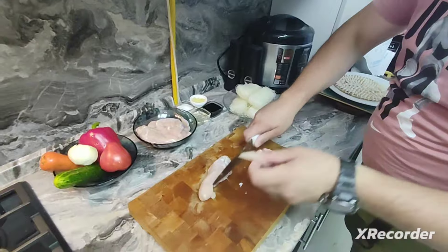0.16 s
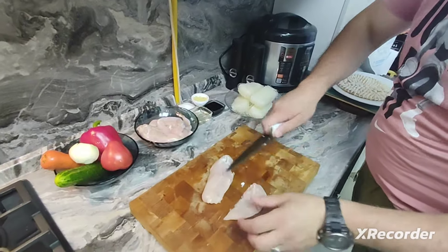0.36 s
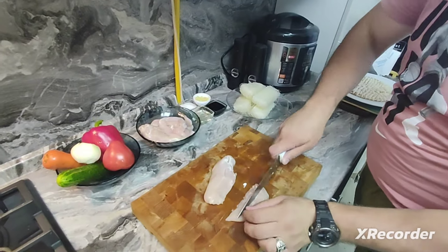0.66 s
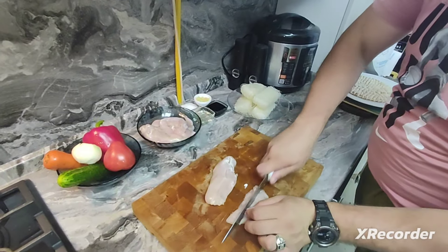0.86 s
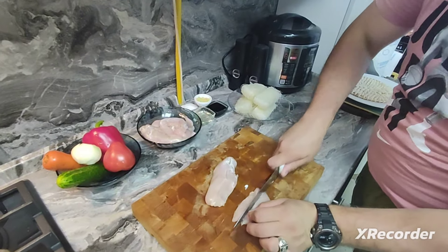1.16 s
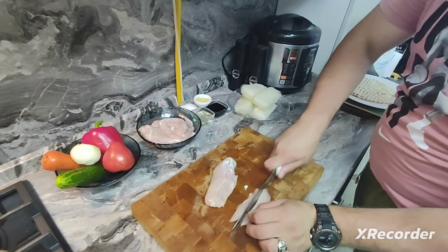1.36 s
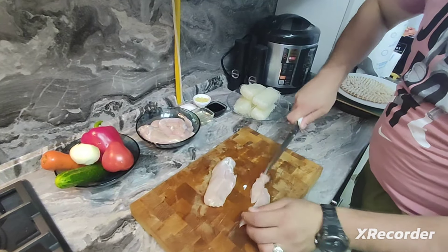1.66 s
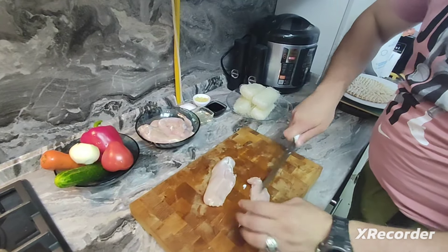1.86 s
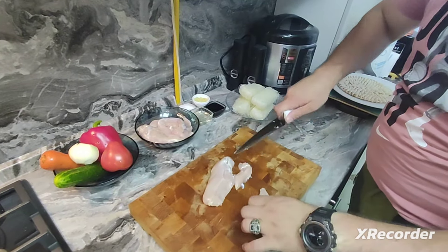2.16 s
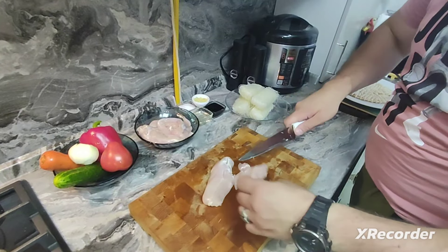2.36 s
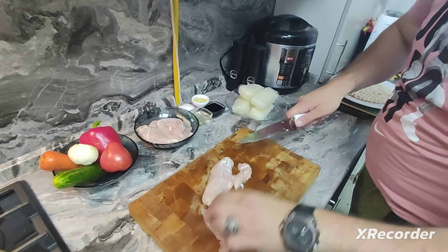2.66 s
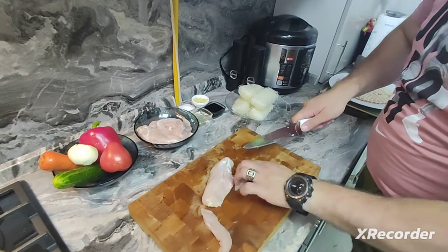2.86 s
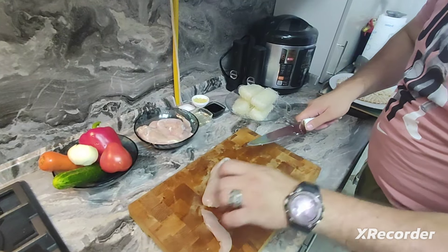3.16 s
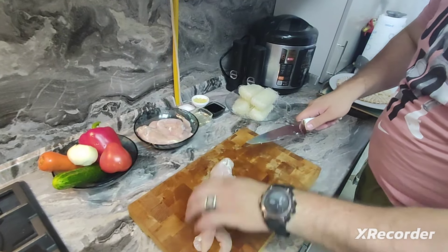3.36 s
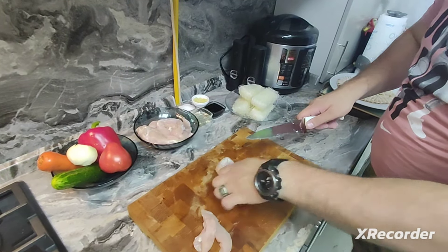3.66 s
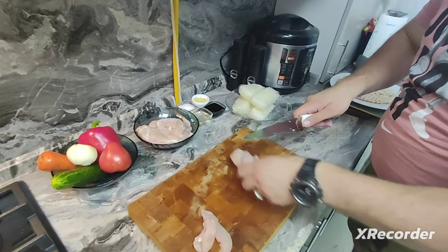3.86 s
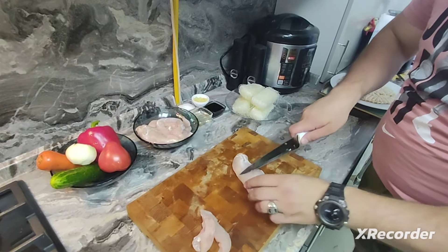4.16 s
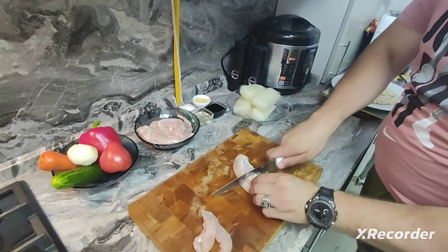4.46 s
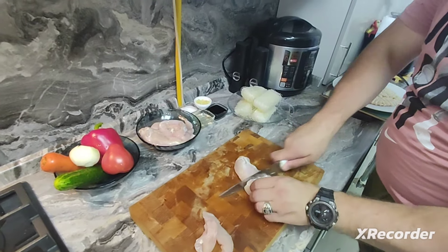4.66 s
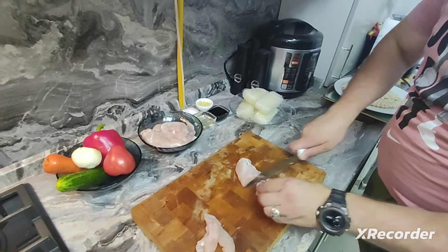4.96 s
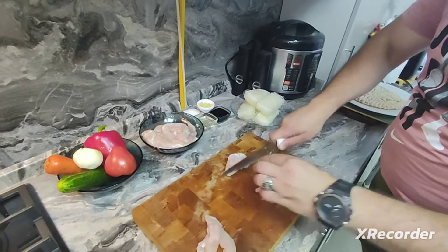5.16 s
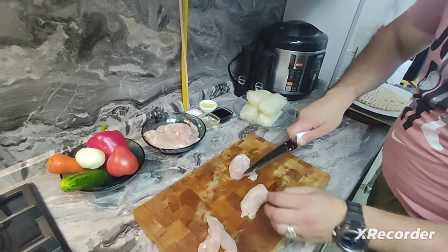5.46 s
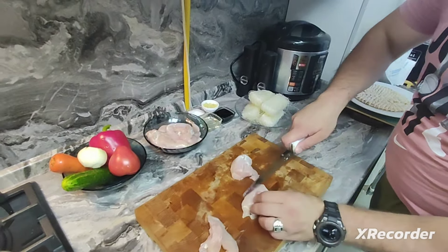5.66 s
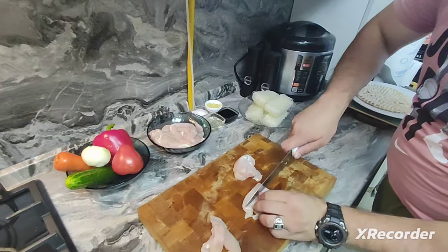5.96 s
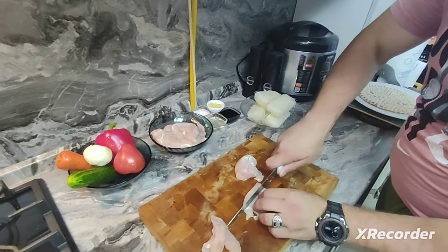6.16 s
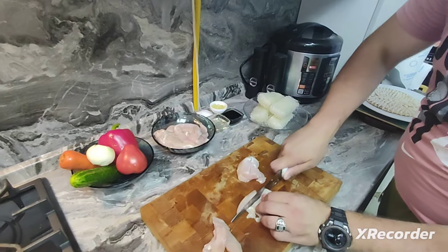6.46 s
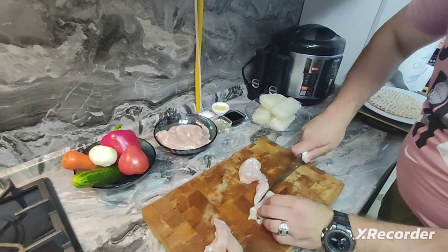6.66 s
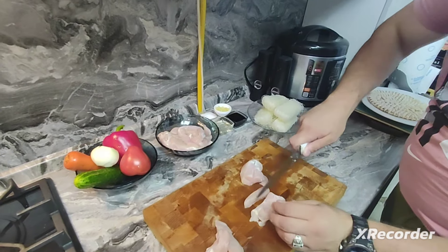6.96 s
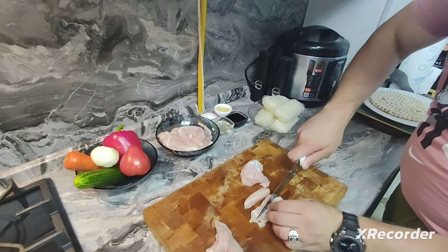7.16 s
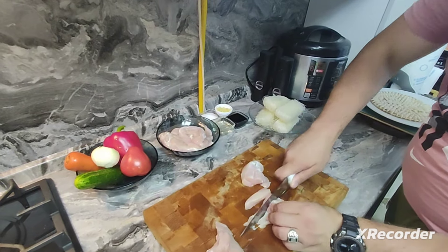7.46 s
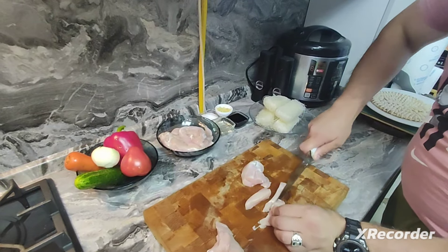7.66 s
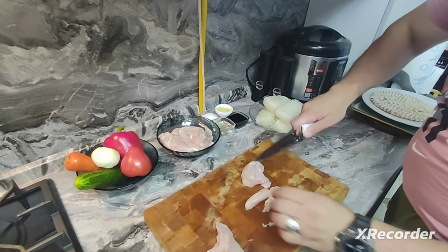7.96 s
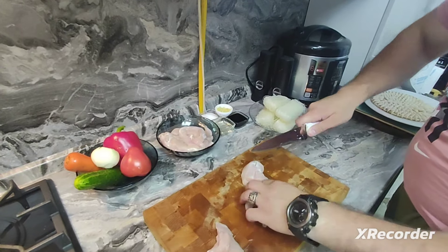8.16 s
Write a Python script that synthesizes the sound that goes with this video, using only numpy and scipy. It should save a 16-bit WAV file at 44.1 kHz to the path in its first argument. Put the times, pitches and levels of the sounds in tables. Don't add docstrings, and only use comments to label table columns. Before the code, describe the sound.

A steady low appliance rumble and airy hiss fill a small, reflective kitchen, heard closely through a phone, with the board stronger on the right. At 0 s the blade skids and knocks on wood with a wet tear; a hard crack follows at 0.33 s. From 0.87 to 1.7 s come grainy, wavering scrapes with soft counter thuds. Sticky peeling and light slaps lead to the hardest clatter at 2.6 s, with a wet slap and fading skid. From 2.9 to 4.4 s there are quieter wet crackles, light taps and a short scrape. Slicing resumes at 4.5-5.1 s, ending in a hollow board boom. A small slap falls at 5.5 s, then relative quiet. A knock at 6.1 s starts firm rasps until 6.8 s; after a pause, another squeaky burst runs 7.35-7.7 s. A faint skid, tap and soft thud close by 8.2 s.

```python
import sys
import numpy as np
from scipy import signal
from scipy.io import wavfile
from scipy.ndimage import uniform_filter1d

SR = 44100
rng = np.random.default_rng(int(sys.argv[2]) if len(sys.argv) > 2 else 0)


def wav_record(signal):
    frames = np.transpose(np.atleast_2d(signal))
    bounded = np.clip(frames, -1, 1)
    quanta = np.round(bounded * 32767).astype(np.int16)
    wavfile.write(sys.argv[1], SR, quanta)


def ratio(d):
    e = np.asarray(d, float) / 20
    return 10 ** e


N = 366030


def evened(x):
    return x / np.sqrt(np.mean(x ** 2) + 1e-20)


def read(points, hz):
    f, value = np.transpose(points)
    return np.interp(np.log(hz + 1), np.log(f + 1), value)


def add(mix, s, sound):
    part = mix[round(s * SR):][:len(sound)]
    part += sound[:len(part)]


def coloured(x, points):
    half = np.log(ratio(read(points, np.fft.rfftfreq(4096, 1 / SR))))
    whole = np.r_[half, half[-2:0:-1]]
    impulse = np.fft.ifft(np.exp(np.conj(signal.hilbert(whole)))).real[:2048]
    return signal.oaconvolve(x, impulse.reshape((1,) * (x.ndim - 1) + (-1,)), axes=-1)[..., :N]


def resonate(x, hz, width_hz):
    r = np.exp(-np.pi * width_hz / SR)
    return evened(signal.lfilter([1, 0, -1], [1, -2 * r * np.cos(2 * np.pi * hz / SR), r * r], x))


def squeak(x, hz, width_hz):
    turn = np.exp(2j * np.pi * np.cumsum(hz) / SR)
    r = np.exp(-np.pi * width_hz / SR)
    smooth = signal.lfilter([(1 - r) ** 2], [1, -2 * r, r * r], x / turn)
    return 2 * (turn * smooth).real


def drift(seconds):
    size = max(int(seconds * SR / 32), 2)
    coarse = rng.standard_normal(N // 32 + 2)
    coarse = uniform_filter1d(uniform_filter1d(coarse, size), size)
    return np.repeat(np.clip(evened(coarse), -2.5, 1.4), 32)[:N]


def grains(per_s, spread_db):
    struck = rng.random(N) < per_s / SR
    sign = rng.choice([-1., 1.], N)
    size = np.minimum(rng.exponential(1, N), 4)
    return evened(struck * sign * ratio(spread_db * size))


def steady(moments_s, values):
    order = np.argsort(moments_s)
    return np.interp(np.arange(N) / SR, moments_s[order], values[order])


SUDDEN_S, SWELL_DB = 0.012, 20


def swells(fullest_s, rise_s, fade_s, db, bend):
    t = np.arange(0, N / SR, .001)[:, None] - fullest_s
    away = np.where(t < 0, -t / abs(rise_s), t / abs(fade_s))
    return (ratio(db - SWELL_DB * np.minimum(away, 10) ** bend) ** 2).sum(1)


def level(power, rest_db):
    return steady(np.arange(len(power)) / 1000, 10 * np.log10(power + ratio(rest_db) ** 2))


# pitch_hz, level_db [dB per Hz]
RUMBLE_SPECTRUM = [(12, -45), (20, -29), (38, -1.5), (70, -3), (103, -1.5), (151, -7), (226, -7), (272, -8),
                   (337, -4), (481, -13), (800, -11.5), (1040, -35), (1760, -120)]
# pitch_hz, width_hz, level_db
HUM_LINES = [(95, 7.9, -63), (125.7, 9.2, -59.5), (225, 11, -67), (367.3, 1.2, -69.5), (823, 6.2, -74.5),
             (1008, 57, -67)]
# pitch_hz, level_db [dB per Hz]
HISS_SPECTRUM = [(500, -25), (780, -15), (1000, 3), (1350, -12), (2100, -6.5), (2500, -0.5), (2800, -10.5),
                 (3500, -21.5), (4200, -5.5), (8000, -12), (11000, -14.5), (13000, 1), (15000, -4.5)]
RUMBLE_DB, HISS_DB = -57.5, -45


def appliance():
    shared = evened(coloured(rng.standard_normal((3, N)), RUMBLE_SPECTRUM))
    rumble = ratio(RUMBLE_DB + drift(0.048)) * (0.84 * shared[0] + 0.82 * shared[1:])
    hum = sum(ratio(db) * resonate(rng.standard_normal(N), hz, width_hz) for hz, width_hz, db in HUM_LINES)
    hiss = evened(coloured(rng.standard_normal((2, N)), HISS_SPECTRUM))
    return rumble + hum + ratio(HISS_DB + 0.46 * drift(0.0077)) * hiss


# pitch_hz, t60_s
KITCHEN_DECAY = [(200, 0.58), (530, 0.12), (1390, 0.085), (3680, 0.12), (9700, 0.11)]


def kitchen(x):
    size = SR // 2
    echoes = np.zeros((3, 2, size))
    at = np.arange(60, size - 20, 20)
    at = at + rng.integers(0, 20, (3, 2, len(at)))
    np.put_along_axis(echoes, at, rng.choice([-1., 1.], at.shape), 2)
    hz, t, z = signal.stft(echoes, SR, nperseg=128)
    fading = ratio(-60 * t / read(KITCHEN_DECAY, hz)[:, None])
    tail = signal.istft(z * fading, SR, nperseg=128)[1]
    tail = tail / np.linalg.norm(tail[0, 0])
    turn = 2 * np.pi * (np.arange(N) / SR * 1.3 + np.arange(3)[:, None] / 3)
    shares = np.sqrt(2 / 3) * np.cos(turn) * x
    return signal.fftconvolve(shares[:, None], tail, axes=2).sum(0)[:, :N]


# start_s, level_db, pitch_hz, overtone_share [ratio]
COUNTER_PUSHES = [(1.264, -35.5, 105, 0.79), (1.28, -39, 140, 0.41), (1.305, -43.5, 169, 0.39),
                  (2.102, -42, 132, 0.19), (2.631, -38, 110, 0.81), (3.546, -38, 101.5, 0.095),
                  (3.941, -39.5, 95, 0.23), (4.449, -42.5, 110, 0.13), (4.531, -39, 113, 0.16),
                  (5.344, -50, 101.5, 0.17), (6.097, -48.5, 197, 1), (6.454, -39.5, 106, 0.74),
                  (8.16, -38.5, 107, 0.071)]


def thuds():
    out, t = np.zeros(N), np.arange(9000) / SR
    band = signal.butter(2, [.005, .016], "band")
    puffs = signal.lfilter(*band, rng.standard_normal((len(COUNTER_PUSHES), len(t))))
    for (s, db, hz, share), puff in zip(COUNTER_PUSHES, puffs):
        tone = (1 - np.exp(-t / 0.0084)) * np.sin(2 * np.pi * hz * t)
        overtones = share * (1 - np.exp(-t / 0.0042)) * evened(puff)
        add(out, s - .005, ratio(db - 60 * t / 0.23) * (tone + overtones))
    return out


# start_s, length_s, pressure_db, region_hz, deep_modes_db [re pressure]
KNIFE_STROKES = [(0.0, 0.042, -34, 2280, -2.5), (0.878, 0.08, -34.5, 1850, -2.5),
                 (0.991, 0.15, -33, 1876, -7), (1.169, 0.15, -32.5, 1960, -9.5),
                 (1.345, 0.2, -30.5, 2040, -8.5), (1.476, 0.23, -37.5, 1840, -6.5),
                 (2.894, 0.18, -60, 2220, -8), (3.597, 0.078, -41.5, 2080, -7),
                 (4.437, 0.13, -45, 2130, -8.5), (4.616, 0.12, -38, 2180, 0.5),
                 (4.666, 0.23, -32, 2280, -9), (4.761, 0.11, -34, 1790, -17), (4.899, 0.093, -36, 1900, -8),
                 (4.977, 0.15, -37, 2280, -4.5), (5.247, 0.049, -45, 2250, -9.5),
                 (6.207, 0.12, -36, 2220, -8), (6.277, 0.075, -43.5, 2270, 5.5),
                 (6.372, 0.074, -35.5, 2280, -1.5), (6.416, 0.088, -34, 2050, -5.5),
                 (6.525, 0.17, -32.5, 2070, -2), (7.353, 0.034, -38.5, 1800, 1.5),
                 (7.365, 0.039, -39, 2170, -9), (7.443, 0.13, -32.5, 1950, -0.5),
                 (7.467, 0.12, -32.5, 2160, 0.5), (7.544, 0.11, -31.5, 2210, -5.5)]
PEAK_AT, STROKE_BEND = 0.39, 3.2


def pressure(lag_s=0):
    start_s, length_s, db = np.transpose(KNIFE_STROKES)[:3]
    fullest_s = start_s + PEAK_AT * length_s + lag_s
    return swells(fullest_s, 0.5 * length_s, 0.71 * length_s, db, STROKE_BEND)


# fullest_s, rise_s, fade_s, crackle_db, fizz_db [re crackle]
MEAT_PEELS = [(.795, 0.048, 0.12, -48, -8), (1.658, 0.26, 0.16, -43, 0), (1.9, 0.041, 0.11, -39, -3.5),
              (2.139, 0.1, 0.096, -39, -19), (2.384, 0.054, 0.091, -34.5, -10),
              (2.988, 0.038, 0.11, -38.5, -3.5), (3.226, 0.051, 0.06, -44, -4),
              (3.38, 0.094, 0.075, -48, -2), (3.419, 0.07, 0.063, -41, -5.5),
              (3.625, 0.13, 0.083, -46.5, 0), (3.74, 0.073, 0.16, -42, -19), (4.201, 0.17, .08, -45, -9),
              (4.356, 0.036, 0.088, -42, -5), (4.534, 0.12, 0.082, -43, -6),
              (4.97, 0.087, 0.27, -42.5, 1.5), (5.059, 0.075, 0.065, -35.5, -6),
              (5.29, 0.068, 0.092, -40.5, -4), (7.322, 0.049, 0.14, -55.5, 14), (8.168, 0.12, .2, -66, 2),
              (1.07, 0.17, 0.08, -41.5, -6), (1.45, 0.058, 0.11, -34.5, -19), (4.74, 0.036, 0.11, -38, -25),
              (4.82, 0.26, 0.041, -50, 5), (6.638, 0.11, 0.066, -39, -7), (7.55, 0.077, 0.14, -40.5, 1.5)]
# start_s, fade_s, crackle_db, fizz_db [re crackle]
MEAT_SLAPS = [(0.0, 0.024, -40, -9), (0.058, 0.084, -35.5, 2), (0.336, 0.12, -35.5, -0.5),
              (0.915, .13, -70, -1), (2.083, 0.12, -40, 1.5), (2.333, 0.065, -34.5, 1),
              (2.579, 0.14, -37.5, -3), (2.633, 0.12, -28.5, -1.5), (2.762, 0.075, -35.5, -10),
              (2.872, 0.13, -39, -1), (3.935, 0.12, -40, -2), (5.51, 0.082, -38, -2.5),
              (6.108, 0.13, -55, 6)]
CUT_CRACKLE_DB, CUT_FIZZ_DB, CUT_LAG_S = -13.5, -15, 0.01
REST_WET_DB, REST_FIZZ_DB = -61, -58.5


def wetness():
    sudden = [(s, SUDDEN_S, *rest) for s, *rest in MEAT_SLAPS]
    s, rise_s, fade_s, db, fizz_db = np.array(MEAT_PEELS + sudden).T
    cut = pressure(CUT_LAG_S)
    crackle = swells(s, rise_s, fade_s, db, bend=1.38)
    crackle = crackle + cut * ratio(CUT_CRACKLE_DB) ** 2
    fizz = swells(s, 1.7 * rise_s, 0.85 * fade_s, db + fizz_db, bend=0.91)
    fizz = fizz + cut * ratio(CUT_FIZZ_DB) ** 2
    return level(crackle, REST_WET_DB), level(fizz, REST_FIZZ_DB)


# pitch_hz, level_db [dB per Hz]
WET_SPECTRUM = [(800, -32.5), (1500, -7), (2300, -2), (3000, -0.5), (4400, 6.5), (5400, 3), (7000, -3),
                (11000, -5.5)]
# pitch_hz, level_db [dB per Hz]
FIZZ_SPECTRUM = [(5000, -20), (8000, -7), (10500, -0.5), (12500, 3), (15000, 5.5)]
FILM_HZ, FILM_WIDTH_HZ, FILM_DB = 3485, 480, -4.5


def meat():
    crackle_db, fizz_db = wetness()
    clumps_db = 2.5 * drift(.008)
    peel = coloured(grains(per_s=5000, spread_db=2.5), WET_SPECTRUM)
    pocket_hz = FILM_HZ * (1 + 0.075 * drift(0.058))
    peel = peel + ratio(FILM_DB) * squeak(peel, pocket_hz, FILM_WIDTH_HZ)
    peel = peel * ratio(crackle_db + 2.5 + clumps_db)
    fizz = coloured(grains(per_s=6800, spread_db=0.5), FIZZ_SPECTRUM)
    return peel + fizz * ratio(fizz_db + 4.0 + 0.83 * clumps_db)


def nearness_db(hz, region_hz, fall_db):
    return -fall_db * abs(np.log2(hz / region_hz))


# start_s, level_db, region_hz, crack_db [re blow], lowest_mode_db [re blow]
BLADE_TAPS = [(0.0469, -24, 2420, -6, -26), (0.0533, -15, 2135, -9.5, -21), (0.3272, -19, 2280, -12, -37),
              (0.3289, -6.5, 2050, -6, -34), (0.3404, -17.5, 2600, 6, -20), (0.3435, -23, 2470, -5, -30),
              (0.3705, -29, 2360, 2.5, -30), (0.8635, -12, 1800, -45, -29), (1.6403, -21, 1900, 4.5, -33),
              (2.33, -42.5, 3400, 10.5, -40), (2.5752, -26, 3840, -18, -25), (2.6268, -7, 2480, -11.5, -27),
              (2.629, -2.5, 2010, -8, -39), (2.6485, -14, 2100, -19, -25), (2.679, -20, 1810, -2, -25),
              (2.633, -12.5, 1930, -5, -55), (2.654, -15, 1910, -25, -18.5), (2.9552, -27, 1780, -20, -13),
              (3.3304, -34, 2000, -13, -27), (3.6305, -31, 2230, -20, -5), (3.645, -29.5, 2270, -20, -20),
              (3.74, -32.5, 2330, -13, -30), (3.932, -19.5, 3710, -9, -17), (3.9345, -26, 1900, -12, -20),
              (5.29, -29, 2650, -16, -34), (4.1095, -21.5, 1880, -7, -48), (5.506, -35, 2690, 6.5, -41),
              (6.1009, -15, 1130, -31, -24), (6.1025, -21, 1750, -26, -38), (6.3814, -31, 2180, -18, -35),
              (6.7331, -22, 2330, -13, -27), (7.3645, -18, 1700, -18, -46), (8.1624, -32, 2300, -19, -17),
              (2.6294, -16.5, 1040, -25, -42)]
# pitch_hz, level_db, t60_s
BOARD_MODES = [(837, -7.5, 0.063), (1086, -3, 0.039), (1458, -3.5, 0.023), (1604, -1.5, 0.041),
               (1810, -2, 0.024), (1876, 2.5, 0.028), (1917, 2, 0.02), (2186, -3.5, 0.026),
               (2280, -3, 0.012), (2384, -4, 0.036), (2496, -9.5, 0.03), (3324, -8.5, 0.017),
               (3820, -29, 0.016)]
CRACK_S, THIN_HZ = 0.004, 2150
RING_SHARE = .6


def taps():
    wood, bright, slap = np.zeros((3, N))
    t = np.arange(6000) / SR
    modes = len(BOARD_MODES)
    chance = rng.standard_normal((len(BLADE_TAPS), len(t) + 2 * modes))
    low_hz, _, low_t60_s = BOARD_MODES[0]
    for (s, db, region_hz, crack_db, low_db), row in zip(BLADE_TAPS, chance):
        crack_s = np.clip(CRACK_S * min(region_hz / THIN_HZ, 1) ** 13.0, .0005, .03)
        burst = row[:len(t)] * np.exp(-t / crack_s) * (1 - np.exp(-t / 0.00019))
        ring = np.zeros(len(t))
        for (hz, mode_db, t60_s), a, b in zip(BOARD_MODES[1:], row[-modes:], row[len(t):]):
            drive_db = 0.87 * mode_db + nearness_db(hz, region_hz, fall_db=14.0) + 2 * a
            decay_db = -60 * t / (RING_SHARE * t60_s)
            ring += ratio(drive_db + decay_db) * np.sin(2 * np.pi * hz * t + 1.2 * b)
        knock = 0.99 * ratio(-60 * t / 0.01) * np.sin(2 * np.pi * region_hz * t)
        lowest = ratio(low_db + 6 - 60 * t / (RING_SHARE * low_t60_s)) * np.sin(2 * np.pi * low_hz * t)
        body = ratio(2.5) * (ring / abs(ring).max() + knock) + lowest
        add(wood, s - .001, ratio(db) * body * (1 - np.exp(-t / 0.0024)))
        add(bright, s - .001, ratio(db + crack_db + 3.0) * burst)
        add(slap, s - .001, ratio(db - 6.5 + 0.26 * (crack_db + 1.5)) * burst)
    return wood + coloured(bright, FIZZ_SPECTRUM) + coloured(slap, WET_SPECTRUM)


# start_s, fade_s, pressure_db, region_hz, deep_modes_db [re pressure]
BLADE_SKIDS = [
    (0.051, 0.094, -30.5, 2200, -4),
    (0.343, 0.11, -36.5, 2240, -6),
    (2.637, 0.13, -29.5, 1750, -5),
    (2.956, 0.021, -32.5, 2020, -1),
    (3.937, 0.031, -39, 1880, 1),
    (6.104, 0.13, -35.5, 1790, -5),
    (6.73, 0.059, -34, 2280, -4.5),
    (7.84, 0.074, -43, 1940, -6.5),
]
# fullest_s, level_db
GRAIN_CATCHES = [(0.888, -30.5), (.9, -40), (.912, -33), (1.007, -47.5), (1.0215, -38), (1.181, -42),
                 (1.231, -32), (1.347, -34), (1.058, -29), (1.108, -33), (1.195, -30.5), (1.22, -40),
                 (1.246, -43), (1.268, -45), (1.369, -38), (1.39, -33), (1.413, -39), (1.44, -29),
                 (1.48, -38), (1.551, -41), (1.564, -28), (1.578, -49), (1.6, -28), (1.641, -42),
                 (4.702, -36), (4.719, -28.5), (4.738, -35), (4.811, -18.5), (4.827, -27), (4.838, -29),
                 (5.034, -41), (5.054, -25.5), (5.078, -36), (6.226, -50), (6.382, -37), (6.432, -41),
                 (6.459, -26), (6.555, -32.5), (6.603, -30), (6.646, -38), (6.591, -32), (7.38, -32.5),
                 (7.393, -37), (7.405, -34), (7.45, -41), (7.471, -41), (7.507, -35), (7.517, -34.5),
                 (7.535, -33), (7.564, -34), (7.61, -31)]
CATCH_RISE_S, CATCH_FADE_S, REST_DB = 0.015, 0.0045, -60


def edge():
    s, fade_s, db = np.transpose(BLADE_SKIDS)[:3]
    caught_s, caught_db = np.transpose(GRAIN_CATCHES)
    catches = swells(caught_s, CATCH_RISE_S, CATCH_FADE_S, caught_db, bend=1.2)
    skids = swells(s, SUDDEN_S, fade_s, db, bend=0.75)
    pressure_db = level(pressure() + catches + skids, REST_DB)
    touch = np.array(KNIFE_STROKES + BLADE_SKIDS)
    middle_s = touch[:, 0] + 0.42 * touch[:, 1]
    return pressure_db, steady(middle_s, touch[:, 3]), steady(middle_s, touch[:, 4])


# fullest_s, rise_s, fade_s, level_db
HAND_LEANS = [(0.06, 0.043, 0.051, 4), (0.9, 0.092, 0.086, -2), (1.28, 0.07, 0.042, 4.5),
              (1.39, 0.11, 0.023, 0), (1.64, 0.096, 0.022, 5.5), (4.78, 0.094, 0.11, -3.5),
              (4.989, 0.087, 0.083, 1.5), (6.479, 0.044, 0.065, 4.5), (6.57, 0.11, 0.039, -1.5),
              (6.74, 0.033, 0.047, 3)]
# fullest_s, rise_s, fade_s, level_db
BOARD_BOOMS = [
    (4.985, 0.055, .12, 11),
    (5.05, 0.06, 0.062, 8),
    (6.57, 0.043, .06, 1),
    (3.64, 0.033, .06, -1),
]
# time_s, pitch_hz
BLADE_SINGING = [
    [(0.0, 2340), (0.05, 2160), (0.12, 2100)],
    [(0.33, 2250), (0.392, 2260), (0.43, 2070)],
    [(0.865, 1840), (0.961, 1910), (1.009, 1860), (1.15, 2180)],
    [(1.16, 2130), (1.256, 1980), (1.33, 2100)],
    [(1.34, 1920), (1.41, 2100), (1.5, 2090), (1.6, 1920), (1.7, 2150)],
    [(2.63, 2020), (2.682, 1900), (2.75, 2040)],
    [(2.95, 1990), (3.02, 2220)],
    [(3.59, 2270), (3.69, 2080)],
    [(3.93, 1950), (4.0, 2130)],
    [(4.62, 2104), (4.738, 2410), (4.79, 1860), (4.89, 1870)],
    [(4.9, 1850), (5.064, 2060), (5.13, 2270)],
    [(6.105, 1990), (6.183, 1760), (6.205, 2060), (6.235, 2150), (6.35, 2050)],
    [(6.37, 2410), (6.45, 2360), (6.498, 1920), (6.55, 2380), (6.625, 2370), (6.664, 2120), (6.76, 2250)],
    [(7.34, 1890), (7.404, 2160), (7.45, 2020), (7.614, 2220), (7.652, 1920), (7.7, 2280)],
]
DAMPED_DB, LOWEST_HZ, DEEP_HZ = -15, 1300, 1650
EDGE_FOCUS_DB = 14
STEEL_HZ, STEEL_WIDTH_HZ, STEEL_DB = 8130, 910, -8


def rasp():
    pressure_db, region_hz, deep_db = edge()
    lean_db = level(swells(*np.transpose(HAND_LEANS), bend=1.45), DAMPED_DB)
    boom_db = level(swells(*np.transpose(BOARD_BOOMS), bend=1.3), 0.0)
    slips = grains(per_s=6000, spread_db=1.3) * ratio(pressure_db + drift(0.016))
    singing_hz = steady(*np.concatenate(BLADE_SINGING).T) * (1 + 0.028 * drift(0.026))
    out = ratio(17) * squeak(slips, singing_hz, width_hz=170)
    hard = slips * ratio(0.68 * (pressure_db + 37.5))
    out += ratio(STEEL_DB) * squeak(hard, np.full(N, STEEL_HZ), STEEL_WIDTH_HZ)
    for k, (hz, db, t60_s) in enumerate(BOARD_MODES):
        reach_db = deep_db + 4.0 if hz < DEEP_HZ else nearness_db(hz, region_hz, EDGE_FOCUS_DB)
        reach_db = reach_db + lean_db * (hz < LOWEST_HZ) + boom_db * (k == 0)
        driven = slips * ratio(db + reach_db + 2.0 * drift(.03))
        rms = np.sqrt(np.mean(driven ** 2))
        out += (-1) ** k * rms * resonate(driven, hz, 2.48 / t60_s)
    return ratio(-7.5) * out


def scene():
    board = rasp() + meat() + taps()
    direct = np.array([ratio(-17) * board, ratio(-3) * np.roll(board, 4)])
    return direct + ratio([[-2], [-7]]) * kitchen(board) + thuds() + appliance()


# pitch_hz, step_db
ROUNDING_STEP = [(300, -60), (1300, -60), (1800, -53), (2300, -42), (3500, -44), (5500, -46), (8000, -46),
                 (10000, -47), (12000, -45), (14500, -44)]
MASKING, WHIM_DB = .45, 4


def dropouts(x):
    hop, shift, bins, size = 1024, 64, 704, 8
    frames, n = N // hop + 2, np.arange(2 * hop)
    kaiser = signal.windows.kaiser_bessel_derived(2 * hop, 4 * np.pi)
    shapes = np.array([kaiser, np.sin(np.pi * (n + .5) / (2 * hop))])
    pick = (uniform_filter1d(rng.standard_normal(frames + 1), size=4) > .12).astype(int)
    window = np.c_[shapes[pick[:-1], :hop], shapes[pick[1:], hop:]]
    phase = np.pi / hop * (n[:, None] + .5 + hop / 2) * (np.arange(bins) + .5)
    basis = np.sqrt(2 / hop) * np.cos(phase)
    padded = np.pad(x, ((0, 0), (hop - shift, (frames + 1) * hop - N - hop + shift)))
    halves = padded.reshape(2, -1, hop)
    z = (np.concatenate([halves[:, :-1], halves[:, 1:]], 2) * window) @ basis
    loud_db = 10 * np.log10((z ** 2).mean((0, 2)) + 1e-20)
    masking_db = MASKING * np.maximum(loud_db - np.percentile(loud_db, 20), 0)[:, None]
    whim = uniform_filter1d(rng.standard_normal((2, frames, bins // size)), size=3, axis=1)
    whim_db = WHIM_DB * np.repeat(evened(whim), size, 2)
    step = ratio(read(ROUNDING_STEP, np.arange(bins) * SR / 2 / hop) + whim_db + masking_db)
    short = (np.diff(padded[1], prepend=0).reshape(-1, 128) ** 2).mean(1)
    sudden = short > 8 * np.roll(uniform_filter1d(short, size=9), 5)
    sudden = sudden.reshape(-1, 8).any(1)
    step = step * np.where(sudden[:-1] | sudden[1:], .1, 1)[:, None]
    rounded = np.sign(z) * step * np.floor((abs(z) / step) ** .75 + .32) ** (4 / 3)
    back = rounded @ basis.T * window
    out = np.zeros_like(halves)
    out[:, :-1] += back[..., :hop]
    out[:, 1:] += back[..., hop:]
    return out.reshape(2, -1)[:, hop - shift:][:, :N]


def top_cut(x):
    return signal.sosfilt(signal.butter(12, 15590, fs=SR, output="sos"), x)


# pitch_hz, gain_db
LEFT_PORT_COLOUR = [(600, 0), (1200, 4), (2500, 1.5), (3500, 3.5), (4700, -6), (5100, -12), (5450, -7),
                    (5950, -17), (7000, -7.5), (7500, -0.5), (9000, -2.5), (9600, -6), (10100, -2.5),
                    (10700, -8.5), (11200, -3.5), (12500, -3), (14000, -8.5), (14350, -21)]
# pitch_hz, gain_db
RIGHT_PORT_COLOUR = [(600, 0), (1150, 5), (1320, 4.5), (1480, 5.5), (2000, 12), (3500, 15), (4500, 3),
                     (4950, -2.5), (5200, 0.5), (6000, -3), (6900, -7.5), (7300, -14.5), (7700, -6.5),
                     (8800, -4.5), (9700, -7.5), (10500, 1), (11500, 7), (13500, 5.5), (14200, 1)]
# pitch_hz [lower, upper]
SHARED_BAND = [430, 950]
SHARED, CEILING, EDGE_HZ = .22, .9, 14300


def record(dry):
    ports = np.array([coloured(dry[0], LEFT_PORT_COLOUR), coloured(dry[1], RIGHT_PORT_COLOUR)])
    lows = signal.firwin(801, SHARED_BAND, pass_zero=False, fs=SR)
    ports = ports + SHARED * signal.oaconvolve(ports[::-1] - ports, lows[None], "same")
    ports = CEILING * np.tanh(ports / CEILING)
    lowpass = signal.firwin(601, EDGE_HZ, window=("kaiser", 5), fs=SR)
    limited = signal.oaconvolve(ports, lowpass[None], "same") + ratio(-46.5) * ports
    mix = dropouts(limited)
    return top_cut(mix)


dry = scene()
out = record(dry)
wav_record(out)
```